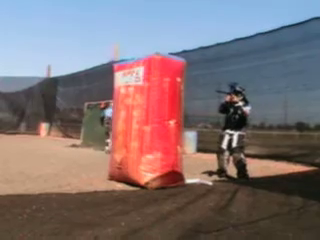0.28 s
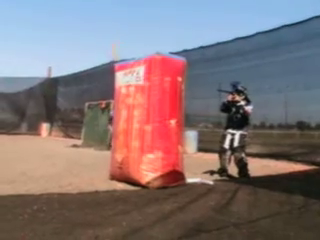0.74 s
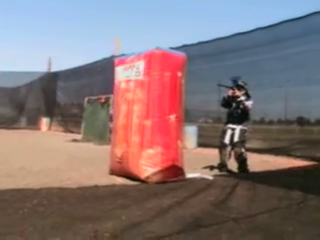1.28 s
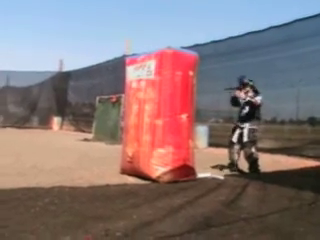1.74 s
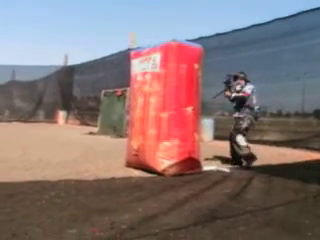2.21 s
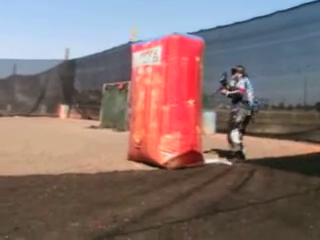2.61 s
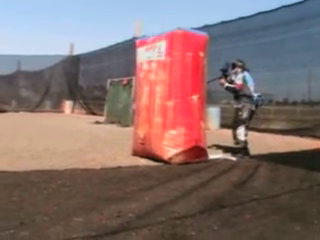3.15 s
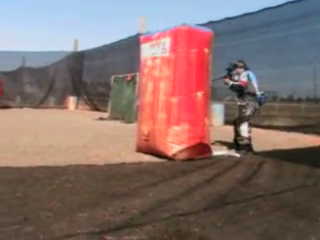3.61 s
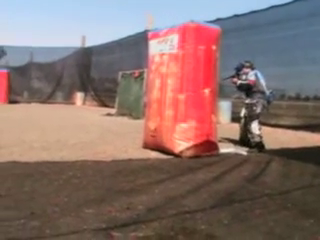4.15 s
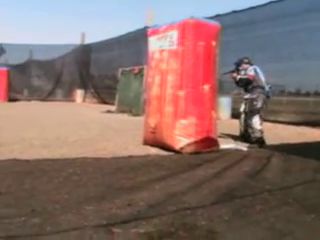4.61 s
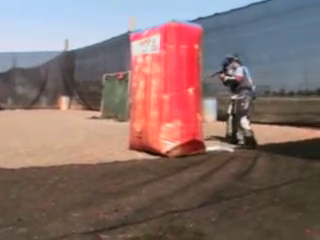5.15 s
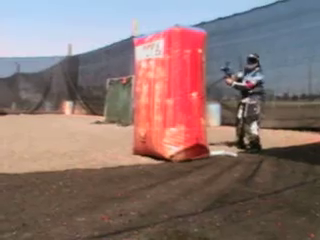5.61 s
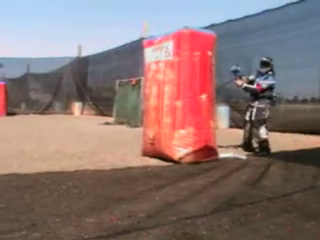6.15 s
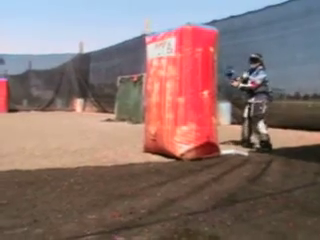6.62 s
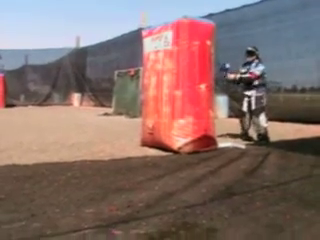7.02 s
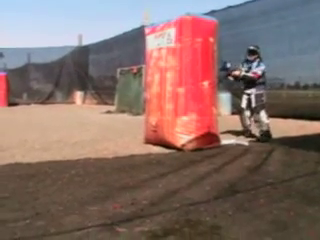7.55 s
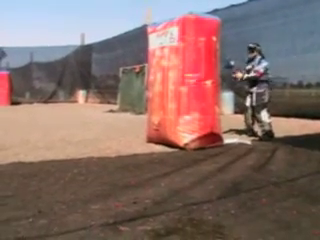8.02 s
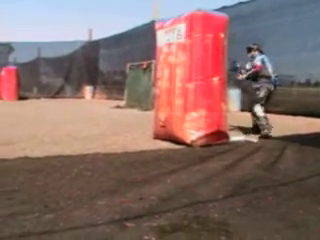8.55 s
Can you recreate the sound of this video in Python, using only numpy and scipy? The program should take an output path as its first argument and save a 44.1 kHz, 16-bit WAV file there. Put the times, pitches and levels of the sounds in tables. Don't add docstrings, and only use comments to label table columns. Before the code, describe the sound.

Dry, hollow cracks and thumps run at around ten to fifteen a second as paintballs strike an air-filled bunker. Early on, hollow marker shots with metallic clicks mix in, then stop. The hits settle into an even rattle, ease into irregular knocks, then surge hard and continue in a quick closing string. Short wash comes off ground, nets and fences, with low wind behind, caught by a cheap, muffled, clipping camera microphone.

```python
import sys
import numpy as np
from scipy import signal
from scipy.io import wavfile
from scipy.ndimage import uniform_filter1d

SR = 44100
rng = np.random.default_rng(int(sys.argv[2]) if len(sys.argv) > 2 else 0)


def pcm_store(signal):
    levels = np.round(np.clip(np.atleast_2d(signal), -1, 1) * 32767)
    wavfile.write(sys.argv[1], SR, levels.astype(np.int16).T)


def undo_db(level):
    steps = np.asarray(level, float) / 20
    return 10 ** steps


N = 386757

# frequency in Hz, level in dB per Hz.
WIND_COLOUR = [(40, -23), (189, 1.5), (989, -15.5), (1890, -3), (2150, -10), (2650, -7.5), (4380, -24),
               (6000, -46.5)]
WIND_DB = -44
# time in seconds, gust level in dB.
GUSTS = [(0.0, 1.5), (0.44, -2.5), (0.8, -10.5), (1.17, 2.5), (1.63, -9.5), (2.22, -3), (2.52, -3.5),
         (2.85, -1), (3.5, -3), (3.9, 3.5), (4.5, -8), (5.3, -1), (5.57, -3.5), (6.2, 0), (6.4, 5.5),
         (6.9, 8), (7.5, 0), (8.77, 4)]
RUMBLE_DB, RUMBLE_PER_GUST = 6.5, 0.69

# start in seconds, level in dB.
SHOTS = [
    (0.0416, -16.5),
    (0.398, -18),
    (0.5697, -18),
    (0.7188, -20),
    (0.869, -21.5),
    (1.0099, -20.5),
    (1.156, -20.5),
    (1.3186, -26.5),
    (1.4711, -21),
    (1.661, -25.5),
]
# frequency in Hz, level in dB, decay time T60 in seconds.
BARREL_MODES = [(278, -0.5, 0.041), (900, 11, 0.011), (1754, 6.5, 0.027), (2550, -7, 0.037),
                (3413, -2, 0.044), (4230, -8.5, 0.023), (5230, -16, 0.022)]

# centre in Hz, width in Hz, level in dB, decay time T60 in seconds.
SCATTER_BANDS = [(122, 130, -15, 0.33), (267, 214, -4.5, 0.15), (650, 335, -4, 0.19),
                 (1183, 664, -12.5, 0.5), (1830, 590, -24.5, 1), (3000, 1460, -36.5, 0.85)]
SHOT_SCATTER_DB = -8.5

# start in seconds, strength in dB, squareness in dB (square hit
# above 0, glancing below), crack pitch in Hz.
SLAPS = [(0.054, -19, -0.5, 325), (0.242, -10.5, 0.5, 873), (0.328, -15.5, -6.5, 926),
         (0.3898, -29, 9, 1210), (0.4784, -27, 4, 630), (0.5455, -25, 5, 690), (0.671, -20.5, 7.5, 1090),
         (0.7508, -18, 2.5, 1060), (0.8711, -17.5, 5, 710), (0.95, -19.5, -5, 910),
         (1.0132, -19.5, -2, 895), (1.1051, -17, -6, 1326), (1.2714, -17, -1.5, 1606),
         (1.3391, -24.5, -2.5, 2630), (1.378, -21.5, 1.5, 1570), (1.4983, -21, 2.5, 1790),
         (1.5282, -22, 4, 1000), (1.7543, -19, -1, 1600), (1.8144, -23.5, 4, 329),
         (1.8528, -18.5, 0.5, 763), (1.9398, -20.5, -2, 1090), (2.0372, -16, -2.5, 1774),
         (2.057, -27.5, 5.5, 790),
         (2.1786, -18.5, -3.5, 1184), (2.3241, -19.5, 4.5, 1182), (2.3855, -20.5, 2.5, 1090),
               (2.4895, -20, 0, 1175), (2.5661, -19.5, 0, 1390), (2.6407, -22, 7, 1100),
               (2.701, -18.5, -6.5, 1170), (2.8155, -19, 0.5, 1402), (2.839, -19, 3, 1820),
               (2.9172, -18.5, 0, 1100), (3.1075, -18, -6.5, 1050), (3.1721, -17.5, 3, 1188),
               (3.2598, -18.5, 5.5, 925), (3.3426, -17.5, -2, 910), (3.4248, -19.5, 0, 1030),
               (3.4896, -18.5, -9, 950), (3.5836, -19.5, 3.5, 1135), (3.685, -18.5, -11.5, 1060),
               (3.7699, -18.5, -9.5, 1400), (3.8331, -18.5, 2.5, 1210), (3.8926, -19.5, 0, 1157),
               (3.988, -17.5, 3.5, 1040), (4.023, -18, 3, 1200), (4.1527, -18, 1, 1072),
               (4.237, -18, -1.5, 1730), (4.3068, -17.5, -3.5, 2030), (4.395, -17, -1.5, 1825),
               (4.4582, -17.5, 1.5, 1678), (4.5511, -20.5, 7, 976),
         (4.7082, -28.5, 1, 1060), (4.878, -15.5, 2.5, 1014), (5.0554, -15.5, -14.5, 866),
          (5.1181, -18, 8.5, 880), (5.2242, -16.5, 3.5, 1170), (5.271, -15.5, -14, 800),
          (5.3566, -18.5, 2, 1570), (5.4388, -26, -5.5, 950), (5.487, -18, -1.5, 856),
          (5.756, -35.5, 2, 606), (5.8431, -17.5, -9, 795), (5.9274, -26.5, -5.5, 305),
          (6.1718, -12, -1.5, 740), (6.2426, -18.5, -26, 710), (6.332, -9, 2, 785),
         (6.685, -7.5, -1, 1644), (6.7728, -9.5, -1.5, 815), (6.8313, -10, -2, 1247),
                (6.9566, -11, -1, 1683), (7.021, -12.5, 2.5, 930), (7.0976, -15.5, -0.5, 915),
                (7.1793, -12.5, 0, 1060), (7.2533, -16, -3.5, 1026), (7.3397, -23.5, 12, 677),
                (7.366, -13, 5.5, 597), (7.4012, -18.5, -3.5, 840), (7.4514, -21.5, 8, 820),
                (7.499, -27.5, 3, 650),
         (7.6657, -17, -2, 1100), (7.749, -13.5, 2.5, 925), (7.834, -18, -1.5, 1210),
               (7.8659, -19, 2.5, 1410), (7.912, -23, -5, 830), (7.9657, -14, 0.5, 653),
               (8.0466, -16.5, 3, 1020), (8.0831, -30, 8.5, 1490), (8.1674, -18.5, -1, 1150),
               (8.2265, -18.5, -0.5, 970), (8.322, -22.5, -10, 600), (8.3527, -27, -1, 930),
               (8.4041, -18.5, -10, 950), (8.441, -24, 1.5, 1000), (8.478, -15, -0.5, 870),
               (8.5276, -24.5, 1.5, 900), (8.585, -18, -4.5, 1450), (8.635, -30.5, -2.5, 920),
               (8.6556, -21.5, -2.5, 1093), (8.697, -25.5, -6.5, 770), (8.7419, -18.5, -4.5, 950),
         (8.236, -22, 0, 800),
    (7.322, -27, -1, 400),
]
ALL_SLAPS = SLAPS
# frequency in Hz, level in dB, decay time T60 in seconds, phase lead in radians.
BUNKER_MODES = [(103, -2, .043, 2.7), (205, -2, .079, -.4), (259, 5, .048, .8), (336, -1, .1, .4),
                (480, 0, .028, .3), (558, -5, .19, -.7), (682, -6, .1, 2.1), (737, -10, .16, 1.3),
                (772, -10, .16, 2.7), (985, -15, .2, -1.3), (1190, -15, .25, .5)]
SKIN_TOP_HZ = 500
CRACK_DB, THUMP_DB, SNAP_DB = 15, 1, -5.5
CRACK_PER_SQUARE, THUMP_PER_SQUARE, SNAP_LOST_SQUARE, SNAP_LOST_GLANCING = 0.93, 1, 0.61, 0.29
THUMP_DB_PER_OCTAVE, USUAL_CRACK_HZ = 1.5, 1100

# start in seconds, knock level in dB, thud level in dB.
SPLATS = [(0.227, -45, -34), (0.8382, -42, -35), (1.2213, -48, -33), (1.617, -49, -29.5), (3.639, -44, -39),
          (4.5114, -49, -32), (6.013, -52, -34), (4.855, -45, -47), (5.105, -29, -46), (5.5805, -46, -34.5),
          (6.07, -55, -36), (6.097, -43, -26), (6.111, -39, -28), (6.1343, -47, -30.5), (6.4518, -30, -28),
          (6.5118, -35, -43), (6.5485, -25.5, -21), (6.606, -30, -30), (6.6654, -23.5, -19.5),
          (7.3161, -21.5, -24), (7.5181, -35, -40), (7.5844, -46, -26), (7.61, -37, -32.5),
          (7.6264, -30, -30), (7.6974, -34.5, -41), (7.737, -30, -31), (7.815, -32, -49.5),
          (7.9963, -27, -20.5), (8.271, -42, -34), (8.545, -37, -25.5)]
# start in seconds, level in dB.
BURSTS = [(0.328, -24.5), (1.1051, -29), (1.2714, -27), (1.379, -20), (1.5282, -23.5), (1.755, -25),
          (2.0576, -18), (2.5654, -25.5), (2.8393, -26), (3.1715, -20), (3.3427, -16), (3.5832, -19),
          (3.8324, -21.5), (3.8932, -18), (4.023, -20.5), (4.236, -21), (4.3073, -24), (4.3958, -23),
          (4.879, -26), (5.357, -23), (6.1716, -14), (6.331, -14), (6.9584, -10.5), (7.2531, -17.5),
          (7.498, -20), (7.6659, -23), (7.749, -11), (7.9646, -17), (8.351, -26.5), (8.6556, -20.5)]

CEILING = .675
LEAK_DB = -28


def unit(x):
    return x / np.sqrt(np.mean(x ** 2))


def band(x, hz, width_hz):
    low = np.sqrt(hz ** 2 + width_hz ** 2 / 4) - width_hz / 2
    return signal.sosfilt(signal.butter(2, [low, low + width_hz], "band", fs=SR, output="sos"), x)


def fade(t, t60):
    return np.exp(-np.log(1000) * t / t60)


def ring(t, hz, t60, lead):
    return fade(t, t60) * np.sin(2 * np.pi * hz * t + lead)


def add(track, s, sound):
    i = int(s * SR)
    track[i:i + len(sound)] += sound[:len(track) - i]


def walk(rate):
    hold = int(SR / rate)
    steps = np.repeat(rng.standard_normal(N // hold + 1), hold)
    return 1.7 * uniform_filter1d(steps, hold)[:N]


def wind():
    hz_points, db_points = np.transpose(WIND_COLOUR)
    gust_db = np.interp(np.arange(N) / SR, *np.transpose(GUSTS))
    rumble_db = RUMBLE_DB + RUMBLE_PER_GUST * gust_db
    out = 0
    for hz in 50 * 2 ** np.arange(0, 7, .5):
        colour_db = np.interp(np.log(hz), np.log(hz_points), db_points) + 10 * np.log10(hz)
        flicker_db = 2.0 * walk(15)
        swell_db = rumble_db if hz < 600 else gust_db
        air = unit(band(rng.standard_normal(N), hz, hz / 3))
        out = out + undo_db(colour_db + flicker_db + swell_db) * air
    return out * undo_db(WIND_DB - 30.5)


def marker():
    out, t = np.zeros(N), np.arange(int(SR / 20)) / SR
    chance = rng.standard_normal((len(SHOTS), len(BARREL_MODES), 2))
    gas = unit(band(rng.standard_normal((len(SHOTS), len(t))), 3800, 5900))
    valve = 1 / (1 + np.exp((t - .0075) / 0.00044))
    opening = valve + undo_db(-17.5) * fade(t, .08)
    for (s, db), shot_chance, hiss in zip(SHOTS, chance, gas):
        pipe = np.zeros(len(t))
        for (hz, mode_db, t60), (level, pitch) in zip(BARREL_MODES, shot_chance):
            pipe -= undo_db(mode_db + 2 * level) * ring(t, hz * (1 + 0.02 * pitch), t60, 1.0)
        bolt_back = band(hiss[::-1], 4300, 1800) * fade(t, 0.036)
        bolt_forward = hiss * fade(t, 0.014)
        add(out, s - .0002, undo_db(db + 2) * (pipe + undo_db(-5.5) * hiss) * opening)
        add(out, s + .018, undo_db(db - 7.5) * bolt_back)
        add(out, s - .02, undo_db(db - 15.5) * bolt_forward)
    return out


def scatter():
    power = np.zeros(N)
    for s, strength_db, _, _ in ALL_SLAPS:
        power[int(s * SR)] = undo_db(2 * strength_db)
    for s, db in SHOTS:
        power[int(s * SR)] += undo_db(2 * (db + SHOT_SCATTER_DB))
    power = np.convolve(power, np.hanning(200) / 100)[:N]
    out = 0
    for hz, width_hz, db, t60 in SCATTER_BANDS:
        wash = signal.lfilter([1], [1, -fade(2 / SR, t60)], power)
        patches = undo_db(1.2 * walk(150))
        out = out + np.sqrt(wash) * patches * undo_db(db) * unit(band(rng.standard_normal(N), hz, width_hz))
    return out


def slaps():
    out, t = np.zeros(N), np.arange(int(SR / 4)) / SR
    chance = rng.standard_normal((len(ALL_SLAPS), len(BUNKER_MODES), 3))
    shell = unit(band(rng.standard_normal((len(ALL_SLAPS), 300)), 1800, 1700))
    push = np.hanning(16) / 8
    snap_fade = np.exp(-(t[:300] / 0.0029) ** 2)
    for (s, strength_db, square, crack_hz), slap_chance, grit in zip(ALL_SLAPS, chance, shell):
        crack_db = strength_db + CRACK_DB + CRACK_PER_SQUARE * square
        crack_pitch_db = THUMP_DB_PER_OCTAVE * np.log2(crack_hz / USUAL_CRACK_HZ)
        thump_db = strength_db + THUMP_DB + THUMP_PER_SQUARE * square + crack_pitch_db
        snap_db = strength_db + SNAP_DB - max(SNAP_LOST_SQUARE * square, -SNAP_LOST_GLANCING * square)
        crack_fade = np.exp(-(t * crack_hz / 2.14) ** 2)
        crack = undo_db(crack_db) * crack_fade * np.sin(2 * np.pi * crack_hz * t + 0.092)
        body = np.zeros(len(t))
        for (hz, db, t60, lead), (share, pitch, turn) in zip(BUNKER_MODES, slap_chance):
            drive_db = thump_db if hz < SKIN_TOP_HZ else strength_db + 0.5
            mode = ring(t, hz * (1 + 0.011 * pitch), t60, lead + 0.59 * turn)
            body += undo_db(db + 2.9 * share + drive_db) * mode
        add(out, s - .0002, np.convolve(crack + body, push))
        add(out, s - .0002, undo_db(snap_db) * grit * snap_fade)
    return out


def splats():
    out, t = np.zeros(N), np.arange(int(SR / 25)) / SR
    noise = rng.standard_normal((len(SPLATS), len(t)))
    for (s, knock_db, thud_db), grit in zip(SPLATS, noise):
        knock = undo_db(knock_db + 12.5) * unit(band(grit, 2000, 860)) * fade(t, 0.013)
        tick = undo_db(knock_db - 9) * unit(band(grit, 3000, 3000)) * fade(t, 0.0051)
        thud = undo_db(thud_db + 7.5) * unit(band(grit, 240, 360)) * fade(t, 0.036)
        add(out, s, knock + tick + thud)
    return out


def bursts():
    out, t = np.zeros(N), np.arange(300) / SR
    shell = unit(band(rng.standard_normal((len(BURSTS), 300)), 2000, 2200))
    for (s, db), grit in zip(BURSTS, shell):
        add(out, s, undo_db(db + 1.5) * grit * np.exp(-(t / 0.0018) ** 2))
    return out


def scene():
    mix = wind() + marker() + scatter() + slaps() + splats() + bursts()
    return mix[None]


def low_pass(x):
    return signal.sosfilt(signal.butter(12, 16900, fs=SR, output="sos"), x)


def record(dry):
    x = signal.sosfilt(signal.butter(3, 65, "high", fs=SR, output="sos"), dry)
    x = signal.sosfilt(signal.butter(6, 5400, fs=SR, output="sos"), x)
    flattened = x / (1 + np.abs(x / CEILING) ** 6) ** (1 / 6)
    filtered = signal.sosfilt(signal.butter(7, 5600, fs=SR, output="sos"), flattened)
    return low_pass(filtered + undo_db(LEAK_DB) * flattened)


dry = scene()
out = record(dry)
pcm_store(out)
```